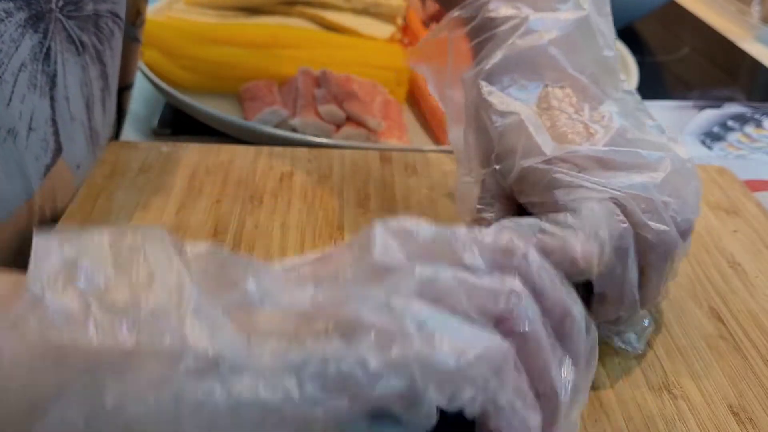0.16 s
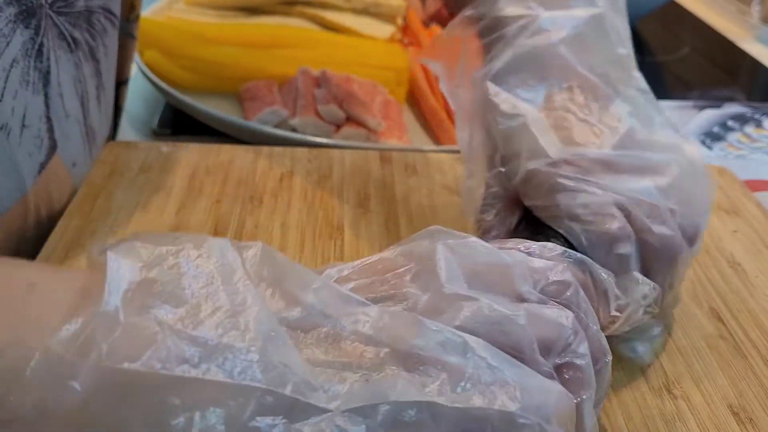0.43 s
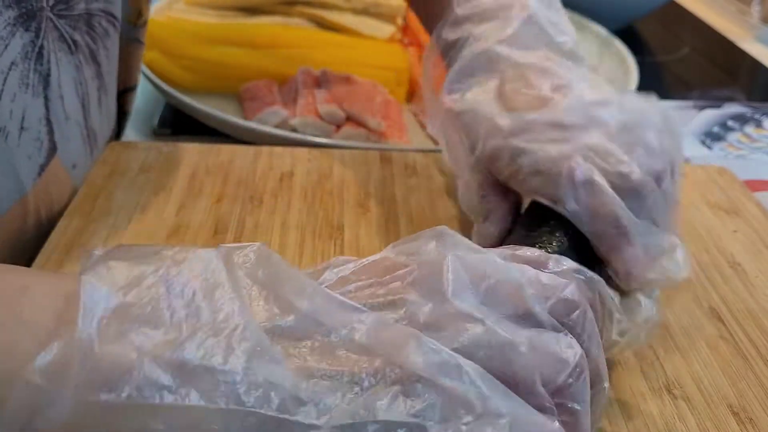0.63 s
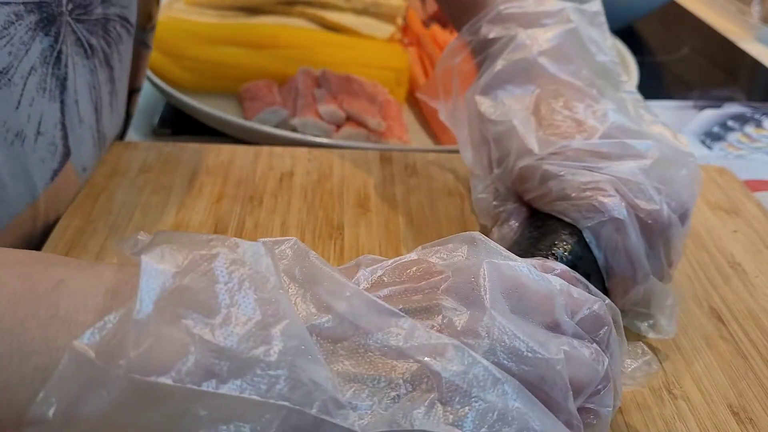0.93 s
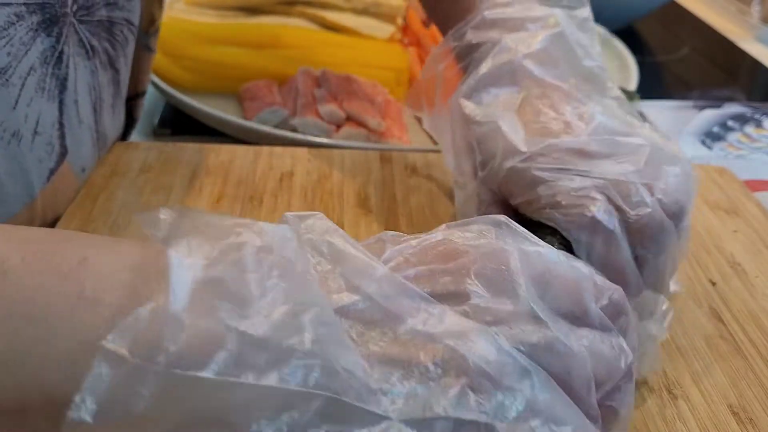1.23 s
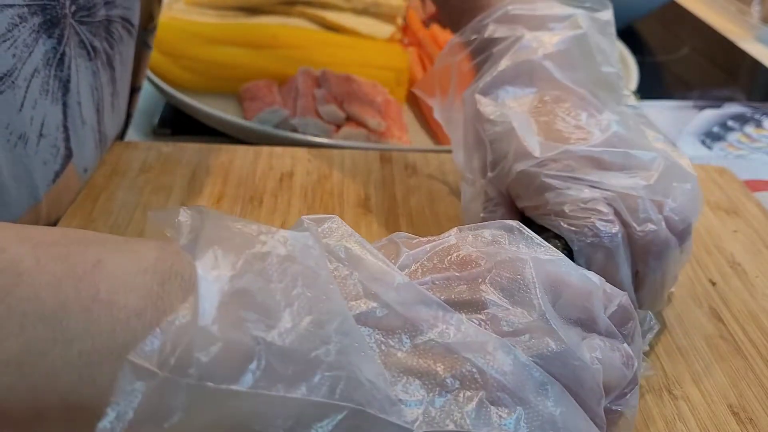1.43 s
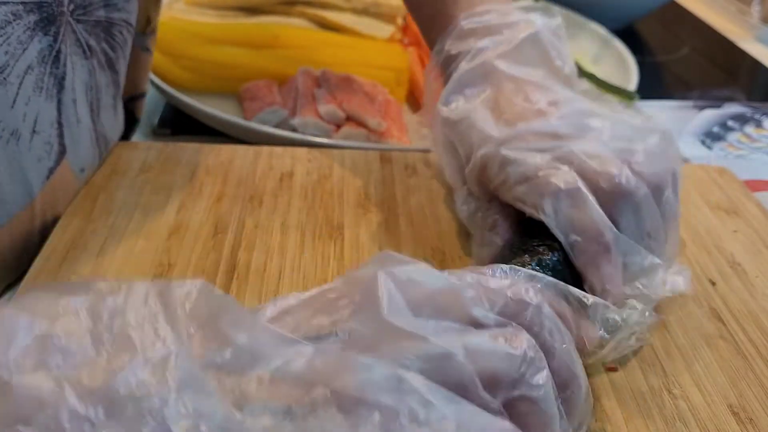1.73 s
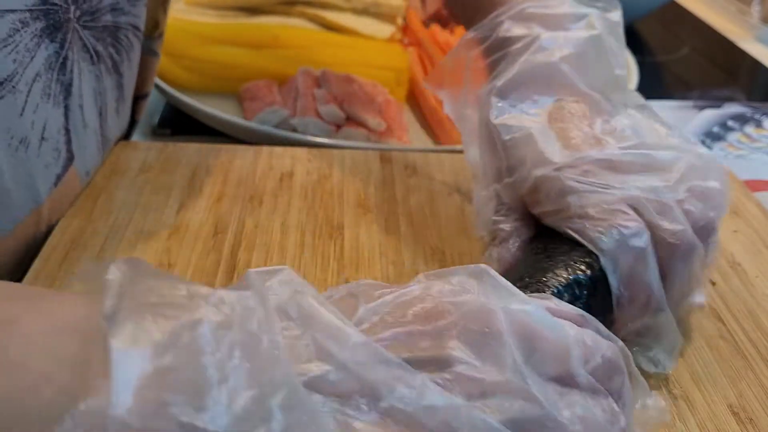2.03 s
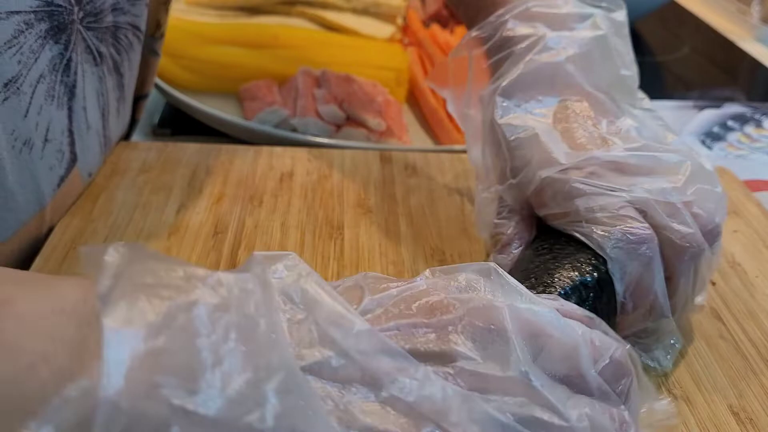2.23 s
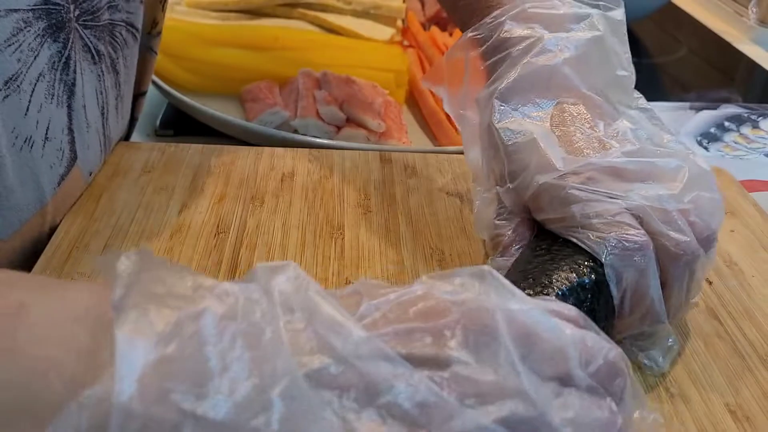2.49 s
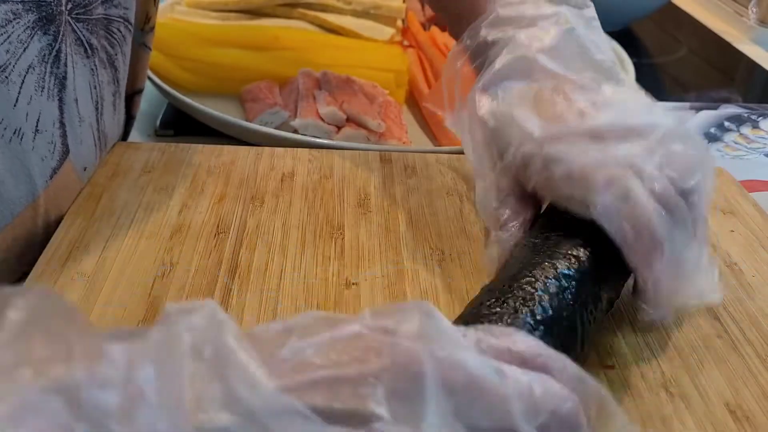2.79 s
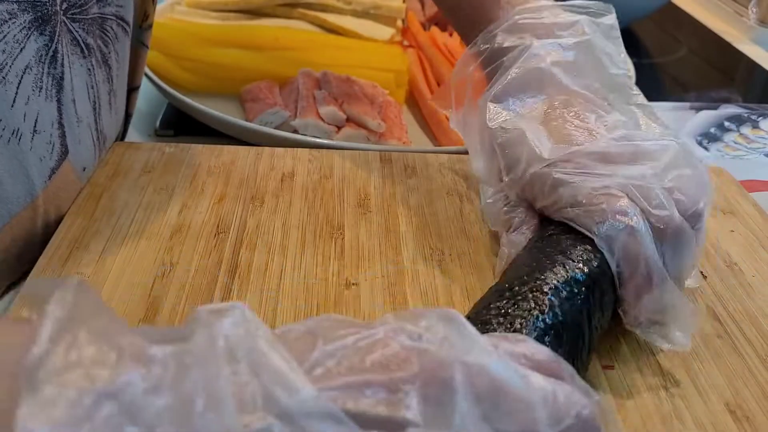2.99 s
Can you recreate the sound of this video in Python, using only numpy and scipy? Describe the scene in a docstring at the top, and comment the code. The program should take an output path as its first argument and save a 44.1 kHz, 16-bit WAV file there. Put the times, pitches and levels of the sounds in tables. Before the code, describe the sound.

Crinkling disposable gloves, busy and crackly, with faint board thumps and a quiet appliance hum

```python
"""Crinkling plastic gloves

Thin plastic gloves crinkle close to a two-port phone microphone as hands roll and press food on a board.
Countless tiny folds are random clicks, denser and louder as the hands move; a small kitchen smears them.
A few single snaps ring briefly, and presses on the board give low thumps.
An appliance rumbles steadily: filtered noise with the low resonances of the room."""
import sys
import numpy as np
from scipy import signal
from scipy.fft import rfft, irfft, next_fast_len
from scipy.io import wavfile
from scipy.ndimage import uniform_filter1d

SR = 44100
rng = np.random.default_rng(int(sys.argv[2]) if len(sys.argv) > 2 else 0)


def volts_from_decibels(level):
    """Turn decibel levels (scalar or array-like) into linear amplitude factors."""
    exponent = np.asarray(level, float) / 20
    return 10 ** exponent


def bounce(signal):
    """Save signal as a 16-bit WAV file at the path given by the first command-line argument."""
    frames = np.transpose(np.atleast_2d(signal))
    limited = np.clip(frames, -1, 1)
    pcm = np.round(limited * 32767).astype(np.int16)
    wavfile.write(sys.argv[1], SR, pcm)


N = 138915  # length in samples
PORT_LAG_S = .00007  # the left port usually hears the gloves this much after the right


def table(rows, hz):
    """Reads (frequency [Hz], level [dB]) points on a log-frequency axis."""
    rows = np.array([r for r in rows if r[0] > 0], float)
    return np.interp(np.log(hz + 1), np.log(rows[:, 0]), rows[:, 1])


def shape(x, gain):
    """Filters a sound by a gain given as a function of frequency."""
    n = next_fast_len(N + 4096)
    hz = np.arange(n // 2 + 1) * SR / n
    return irfft(rfft(x, n) * gain(hz), n)[..., :N]


def level(x, db):
    """Sets the average (rms) level in dB."""
    return x * volts_from_decibels(db) / np.sqrt(np.mean(x ** 2))


def walk(rate):
    """Wandering random values, each gliding to the next in 1 / rate s; typical swing about a third."""
    k = max(int(SR / rate), 2)
    held = np.repeat(rng.standard_normal(N), k)[:N]
    return 0.43 * uniform_filter1d(held, k)


def folds(move_db, per_s, spread_db):
    """Tiny folds: random clicks of constant mean power, each reaching the two ports with its own lag."""
    lag_spread_s, quiet_density = .00013, .8  # fold rate follows movement amplitude ** quiet_density
    movement = volts_from_decibels(quiet_density * (move_db - move_db.max()))
    chance = np.clip(per_s / SR * movement, 1e-3, 1)  # of a fold at each sample
    happens = rng.random(N) < chance
    strength = volts_from_decibels(spread_db * np.minimum(rng.exponential(size=N), 3.5))
    sign = rng.choice([-1., 1.], N)
    right = happens * sign * strength / np.sqrt(chance)  # rarer folds are stronger
    lag_s = PORT_LAG_S + lag_spread_s * rng.standard_normal(N)
    arrival = np.clip(np.arange(N) + np.round(lag_s * SR).astype(int), 0, N - 1)
    left = np.bincount(arrival, right, N)
    return level(np.array([left, right]), 0)


# Hand movement: (time [s], crinkle level before the final gain [dB])
HAND_MOVEMENT = [(0.0, -42.5), (0.034, -42), (0.102, -48.5), (0.202, -41), (0.248, -46.5), (0.332, -43.5),
                 (0.425, -53.5), (0.5, -43), (0.54, -40.5), (0.6, -45.5), (0.625, -45), (0.82, -48.5),
                 (0.92, -55), (0.975, -63), (1.018, -50.5), (1.054, -42.5), (1.184, -45.5), (1.2, -39.5),
                 (1.26, -46.5), (1.29, -42), (1.37, -50), (1.405, -54.5), (1.465, -60.5), (1.558, -40),
                 (1.685, -50), (1.736, -44), (1.77, -45.5), (1.8, -43), (1.845, -48), (1.94, -49),
                 (2.058, -47.5), (2.18, -55), (2.24, -48.5), (2.27, -45.5), (2.316, -49), (2.33, -45.5),
                 (2.395, -48), (2.41, -44.5), (2.43, -53), (2.505, -59), (2.554, -50), (2.628, -38.5),
                 (2.675, -48.5), (2.8, -50.5), (2.856, -37.5), (3.01, -49), (3.06, -60), (3.078, -41.5),
                 (3.084, -46), (3.15, -41)]
# Sudden bunches of folds: (time [s], level before the final gain [dB], fade time of the power [s])
FOLD_BUNCHES = [(.914, -53, 0.0039), (1.718, -49, 0.018), (2.247, -50, 0.012), (2.325, -41.5, 0.012),
                (2.804, -42, .025), (3.0745, -56, 0.0047)]
# Changing place and tone: (time [s], left minus right [dB], extra low-mid body [dB],
# extra level near the hollow band [dB])
GLOVE_TONE = [(0.0, -2, 1, 2), (0.2, 1, 4, -3), (0.51, -2.5, -3, 1), (0.6, 0, 2.5, -1.5),
              (0.93, -1.5, -1.5, 0), (1.99, -0.5, 2.5, -1), (2.77, -0.5, -0.5, 1.5),
              (2.86, -0.5, 4.5, -2.5), (3.0, -2.5, 2, 0.5), (3.06, 0.5, -1, -2.5), (3.15, -1.5, 3, 0)]
# Crinkle colour at each port: (frequency [Hz], relative level per Hz [dB])
FILM_COLOUR_LEFT = [(260, -32), (450, -8), (740, -5.5), (900, -7.5), (1450, -1.5), (1810, -2.5), (7460, -2),
                    (8900, -4), (11600, 1.5), (15400, -2)]
FILM_COLOUR_RIGHT = [(260, -20.5), (450, -5), (740, -4.5), (900, -9.5), (1450, 1.5), (1810, -3.5),
                     (7460, 0.5), (8900, -7.5), (11600, 0), (15400, -6)]


def gloves():
    """Wide folds plus narrower ones in octave bands, fluttering in bunches, coloured by the film."""
    body_hz, hollow_hz = 1800, 2920
    wide_share, gain_db = .2, 5  # share of power in the wide folds; final gain
    t = np.arange(N) / SR
    power = volts_from_decibels(np.interp(t, *np.array(HAND_MOVEMENT).T)) ** 2
    for s, db, decay in FOLD_BUNCHES:
        power = power + volts_from_decibels(db) ** 2 * (t >= s) * np.exp(-np.abs(t - s) / decay)
    move_db = 10 * np.log10(power)
    times, *tones = np.array(GLOVE_TONE).T
    pan_db, body_db, hollow_db = (np.interp(t, times, tone) for tone in tones)

    # folds per second at full movement, then how uneven they are in dB
    wide = folds(move_db, 3500, 3.2)
    out = 0
    for hz in 250 * 2 ** np.arange(7):
        narrow = folds(move_db, 8000, 2.2)
        clicks = np.sqrt(wide_share) * wide + np.sqrt(1 - wide_share) * narrow
        band = shape(clicks, lambda f: np.cos(np.pi / 2 * np.clip(np.log2((f + 1) / hz), -1, 1)) ** 2)
        body = body_db / (1 + (hz / body_hz) ** 2)
        hollow = hollow_db * np.exp(-2 * np.log2(hz / hollow_hz) ** 2)
        out = out + band * volts_from_decibels(1.8 * walk(40.28) + body + hollow)  # each band flutters on its own
    films = (FILM_COLOUR_LEFT, FILM_COLOUR_RIGHT)
    out = np.array([shape(c, lambda f: volts_from_decibels(table(film, f))) for c, film in zip(out, films)])
    shared_flutter_db = 2.2 * walk(90)
    db = move_db + shared_flutter_db + np.array([pan_db, -pan_db]) / 2
    return level(out, gain_db) * volts_from_decibels(db)


# Colour of the broad rumble: (frequency [Hz], relative level per Hz [dB])
RUMBLE_COLOUR = [(15, -46), (25, 4), (54, -14.5), (140, -1), (189, -3), (252, -3.5), (389, -5.5),
                 (600, -15.5), (900, -18.5), (1170, -41), (1980, -120)]
# Room resonances fed by the rumble: (frequency [Hz], width at half amplitude [Hz], level [dB])
ROOM_RESONANCES = [(62.8, 16.5, -60), (119.4, 38, -61.5), (168, 20, -60.5), (239.4, 41, -56.5),
                   (271.6, 23, -59), (324, 53, -61)]
# How much the ports differ: (frequency [Hz], side minus mid [dB])
RUMBLE_WIDTH = [(40, -29), (110, -7.5), (200, -19.5), (380, -6.5), (700, 0)]
# Which port is louder: (frequency [Hz], left minus right [dB])
RUMBLE_PAN = [(40, -5), (66, -4), (130, -1.4), (300, -.8)]


def rumble():
    """Steady low noise and the room resonances it excites, nearly alike at both ports; carries the presses."""
    def one():
        """One independent draw of the rumble: broad noise plus a noise band for each resonance."""
        out = level(shape(rng.standard_normal(N), lambda f: volts_from_decibels(table(RUMBLE_COLOUR, f))), -55)
        for hz, width, db in ROOM_RESONANCES:
            band = shape(rng.standard_normal(N), lambda f: 1 / (1 + (2 * (f - hz) / width) ** 2))
            out = out + level(band, db)
        return out
    mid = one() + presses()
    side = shape(one(), lambda f: volts_from_decibels(table(RUMBLE_WIDTH, f)))
    ports = [shape(mid + k * side, lambda f: volts_from_decibels(k * table(RUMBLE_PAN, f) / 2)) for k in (1, -1)]
    return np.array(ports)  # left, right


def room(x):
    """Short kitchen echo: a fading burst of noise, different at each port, smears the sound."""
    room_db, t60_s = -11, .3  # echo level; time to fade by 60 dB
    t = np.arange(SR // 2) / SR
    tail = rng.standard_normal((2, len(t))) * volts_from_decibels(-60 * t / t60_s) * (t > .002)
    tail = tail / np.sqrt(np.sum(tail ** 2, 1, keepdims=True))
    return x + volts_from_decibels(room_db) * signal.fftconvolve(x, tail, axes=1)[:, :N]


# Thumps as the hands press on the board: (time [s], strength before the rise and fade [dB])
BOARD_PRESSES = [(0.019, -40), (0.2, -42), (0.672, -42.5), (1.077, -43.5), (2.57, -44.5), (2.86, -43)]


def presses():
    """Each press is a low tone near the lowest room resonance that swells softly and fades."""
    hz, rise_s, decay_s = 67.8, 0.014, 0.062
    t = np.arange(N) / SR
    out = 0
    for (s, db), turn in zip(BOARD_PRESSES, rng.random(len(BOARD_PRESSES))):
        age = np.maximum(t - s, 0)
        swell = (1 - np.exp(-(age / rise_s) ** 2)) * np.exp(-age / decay_s)
        out = out + volts_from_decibels(db) * swell * np.sin(2 * np.pi * (hz * age + turn))
    return out


# Single snaps of the film: (time [s], strength of the low ring before its fade [dB],
# pitch [Hz], left minus right [dB])
FILM_SNAPS = [(0.206, -38, 1470, -1), (2.9212, -37, 1200, -4.5), (2.9846, -31.5, 1400, -7),
              (3.0062, -41, 1500, 0), (3.106, -38, 1440, -1)]


def snaps():
    """Each snap of the film is a bright tick and a few damped low cycles."""
    cycles, tick_db, tick_hz = 2.2, 7, 5300  # fade in cycles; tick level over the low ring; tick pitch
    out = np.zeros((2, N + 512))
    t = np.arange(400) / SR

    def ring(hz):
        """A sine wave that dies away within a few cycles."""
        return np.sin(2 * np.pi * hz * t) * np.exp(-t * hz / cycles)

    for s, db, hz, pan_db in FILM_SNAPS:
        snap = ring(hz) + volts_from_decibels(tick_db) * ring(tick_hz)
        for c, lag in ((0, PORT_LAG_S), (1, 0)):  # left, right
            i = int((s + lag) * SR)
            out[c, i:i + 400] -= snap * volts_from_decibels(db + pan_db * (.5 - c))
    return out[:, :N]


def scene():
    """Gloves and snaps in the room, over the rumble and presses."""
    return room(gloves() + snaps()) + rumble()


def band_limit(x):
    """A steep low-pass at the top of the band."""
    return signal.sosfilt(signal.butter(12, 16700, fs=SR, output="sos"), x)


def record(dry):
    """Adds faint microphone hiss, then rolls off the bass and cuts the top steeply."""
    top_hz, bottom_hz, hiss_db = 15470, 39, -63  # hiss level is before the filter

    def edges(f):
        """Gain of the microphone's bass roll-off and top cut."""
        top = np.clip((top_hz - f) / 150 + .5, 0, 1)
        return top * f ** 4 / np.sqrt(f ** 8 + bottom_hz ** 8)

    hiss = volts_from_decibels(hiss_db) * rng.standard_normal(dry.shape)
    return band_limit(shape(dry + hiss, edges))


dry = scene()
out = record(dry)
bounce(out)
```